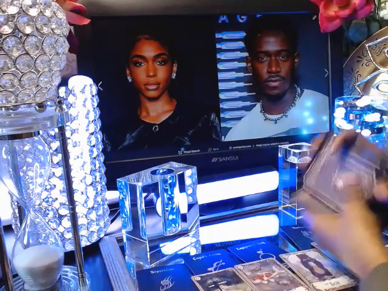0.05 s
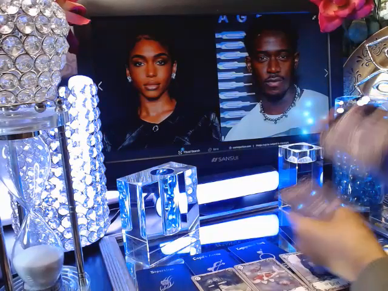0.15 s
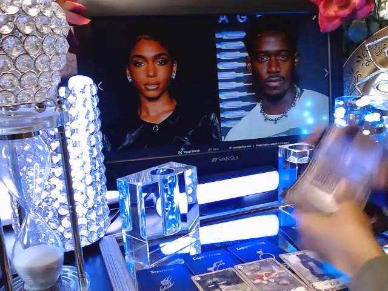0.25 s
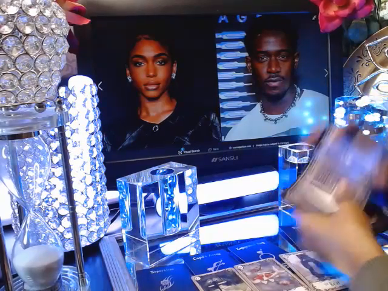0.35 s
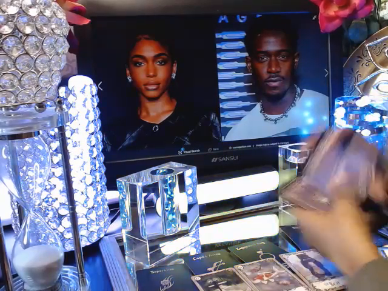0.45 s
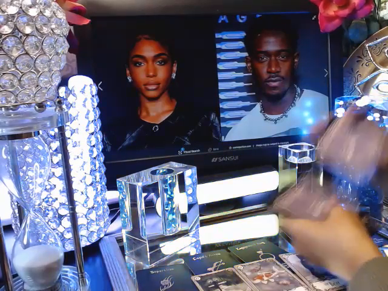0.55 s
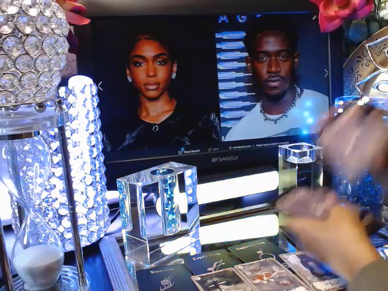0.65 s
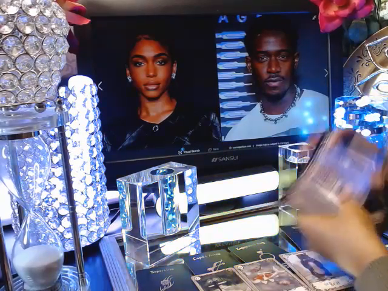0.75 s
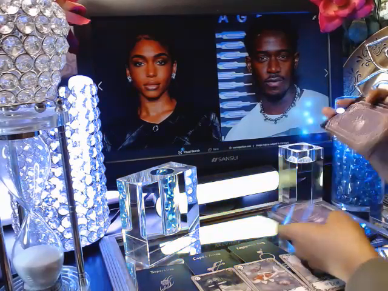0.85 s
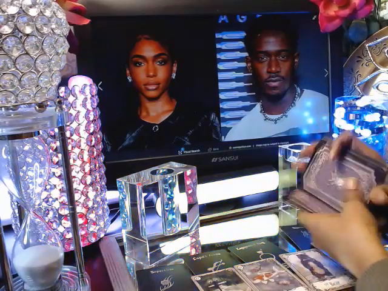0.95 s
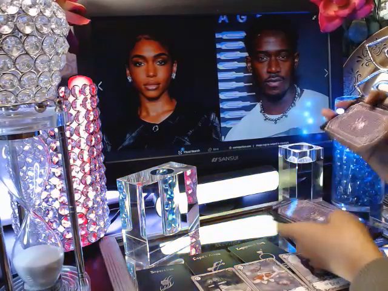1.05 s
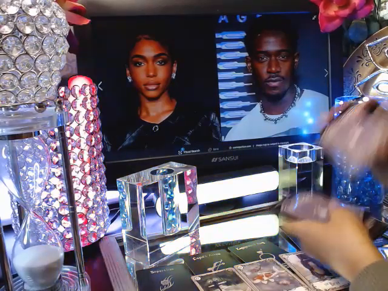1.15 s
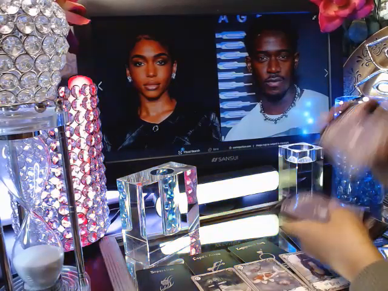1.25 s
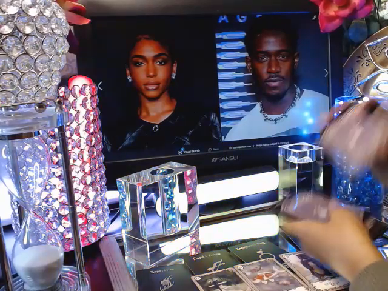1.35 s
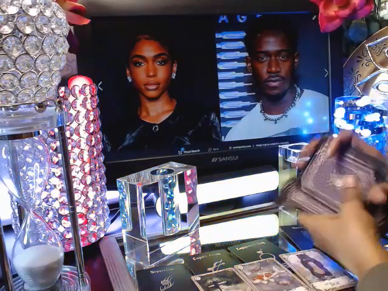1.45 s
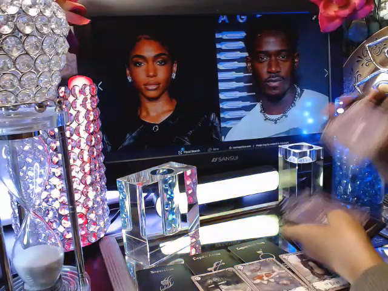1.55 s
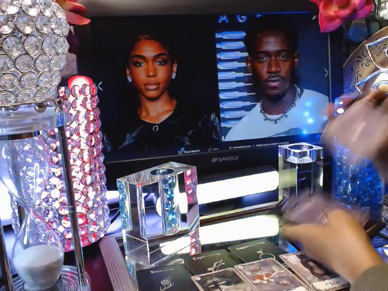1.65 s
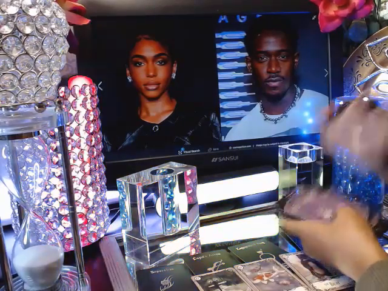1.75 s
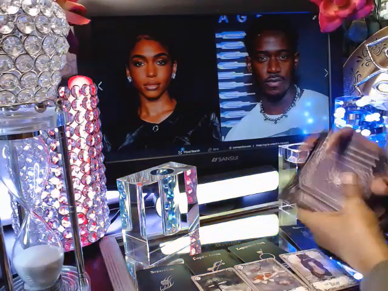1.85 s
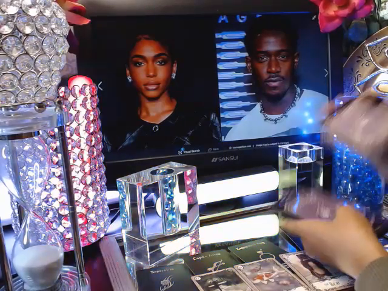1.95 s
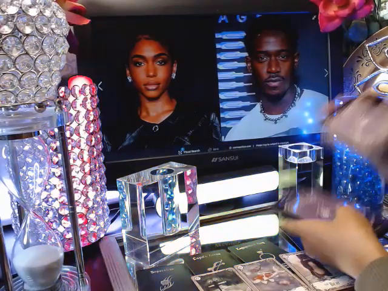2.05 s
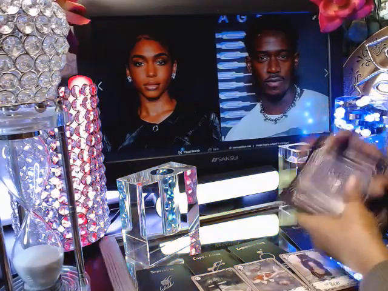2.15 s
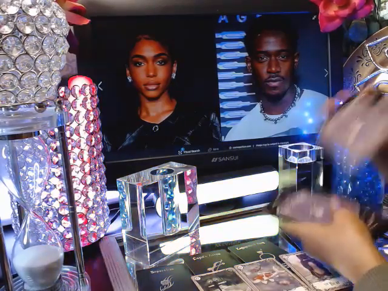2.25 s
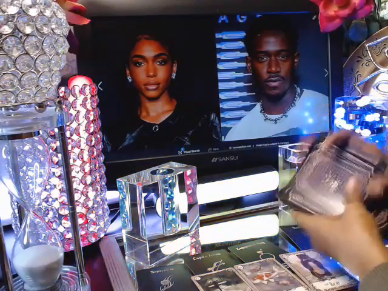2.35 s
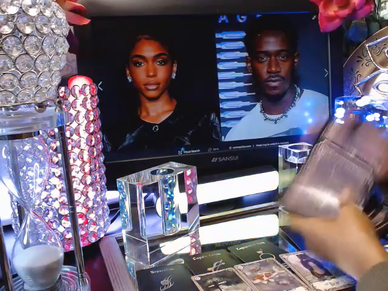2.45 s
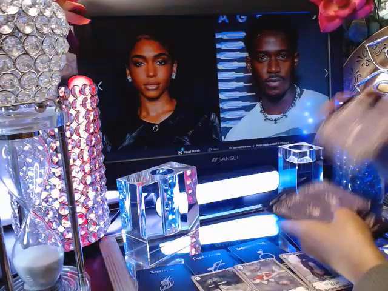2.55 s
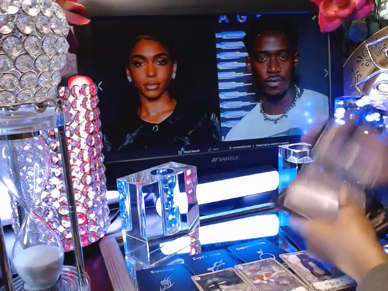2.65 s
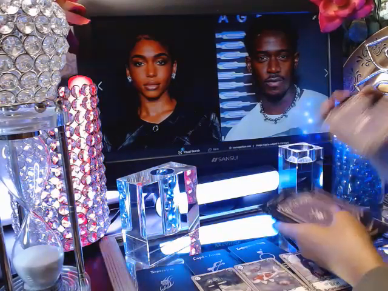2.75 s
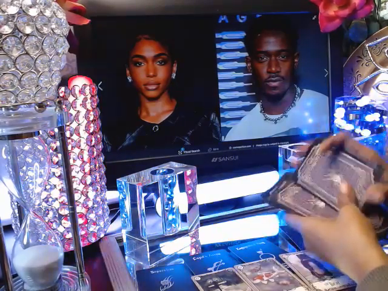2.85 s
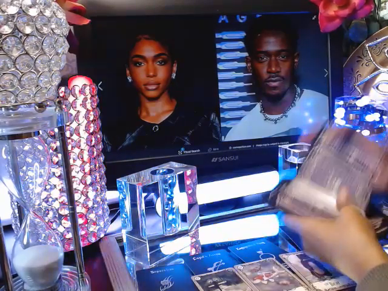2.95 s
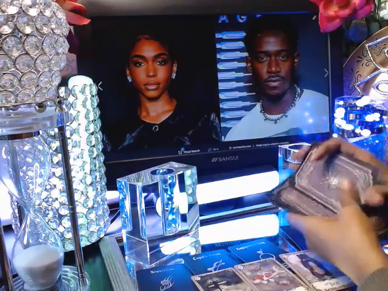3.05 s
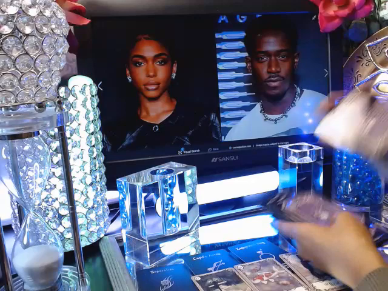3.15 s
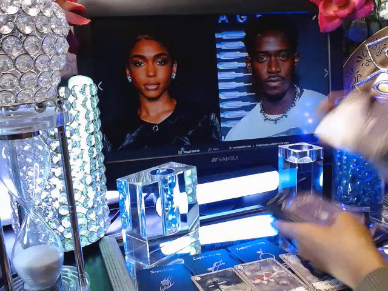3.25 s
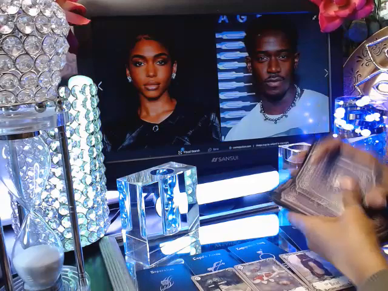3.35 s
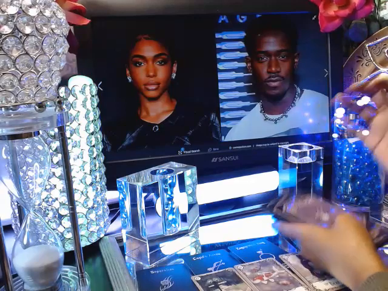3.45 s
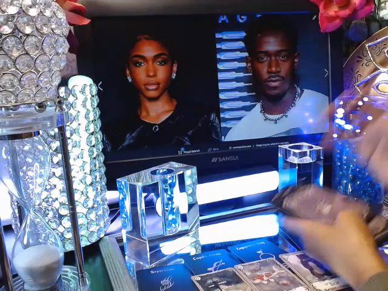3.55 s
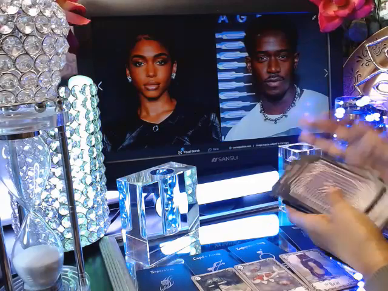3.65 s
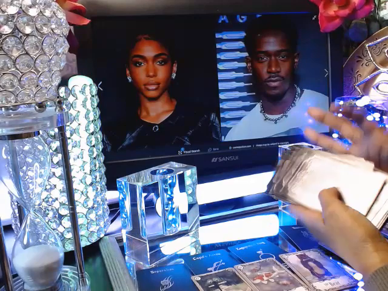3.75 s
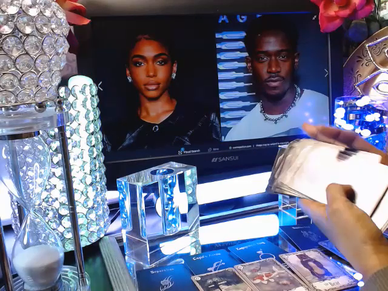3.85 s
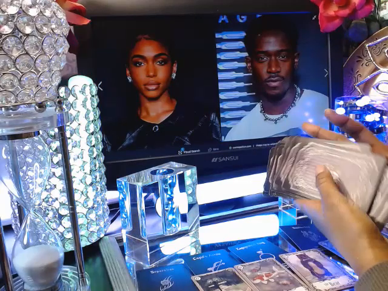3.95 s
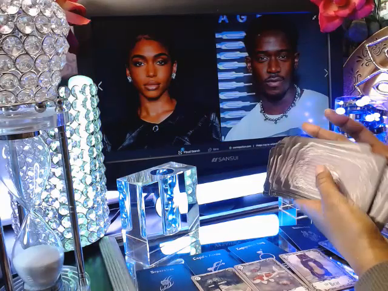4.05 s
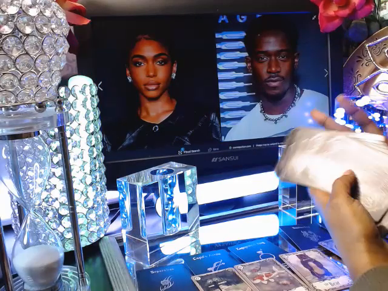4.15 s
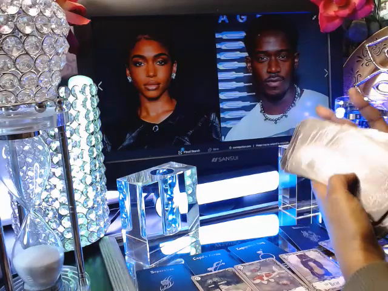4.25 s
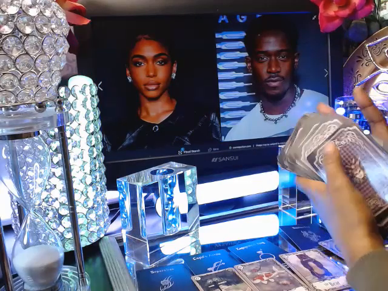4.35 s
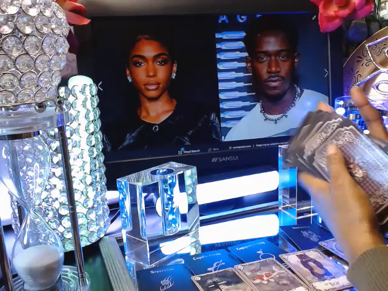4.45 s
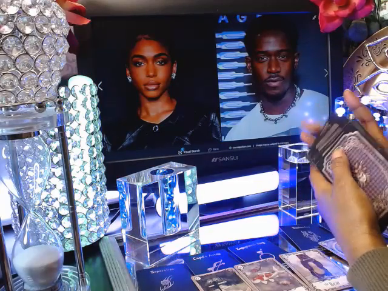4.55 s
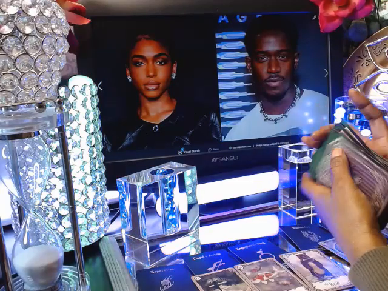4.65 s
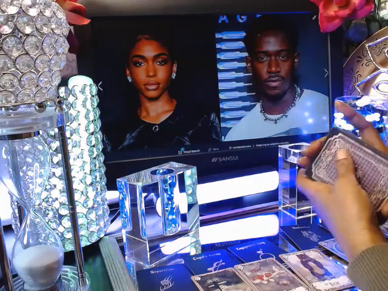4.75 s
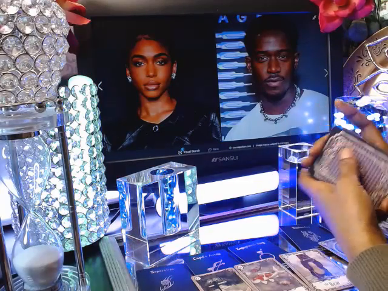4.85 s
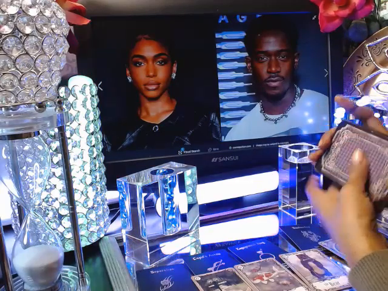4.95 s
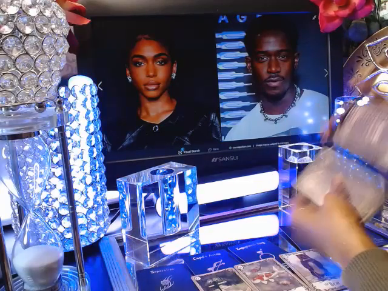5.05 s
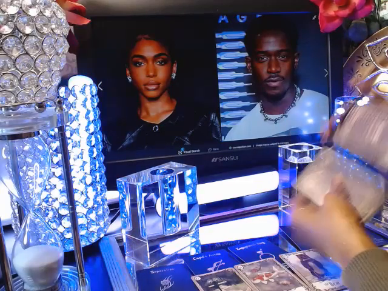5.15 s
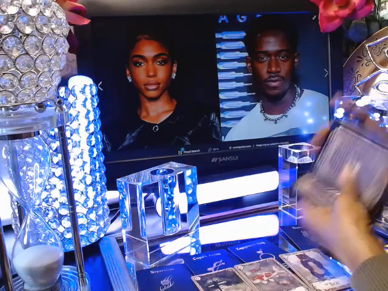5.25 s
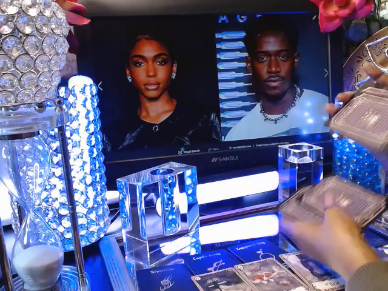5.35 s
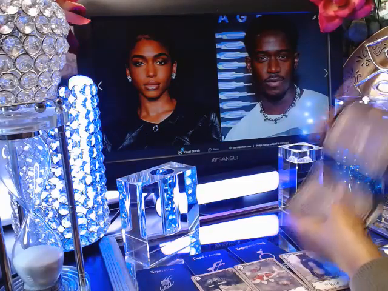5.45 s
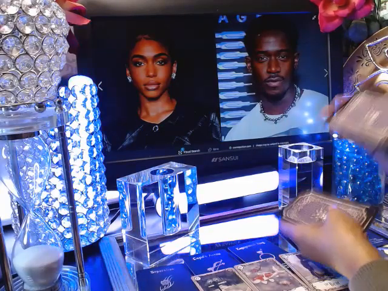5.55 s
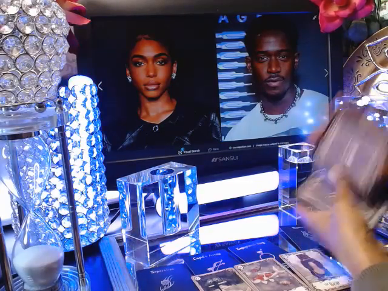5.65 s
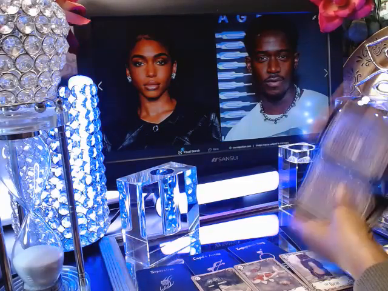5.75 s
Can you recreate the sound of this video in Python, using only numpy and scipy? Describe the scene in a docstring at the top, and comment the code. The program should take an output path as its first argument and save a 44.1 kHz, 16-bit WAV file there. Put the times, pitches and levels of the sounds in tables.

```python
"""An appliance hums in a small room: wavering tones over shaped noise for the air, with cards rubbing faintly in the hand.
A deck of large cards is shuffled overhand, about four strokes a second. In each stroke a packet slides in on
grainy noise, slaps onto the ringing deck, and card edges tick as the next packet is lifted.
After some three and a half seconds the strokes pause while the deck is turned and slips in the palm; then they resume.
A diffuse echo follows every card sound, and the close microphone rounds the loudest peaks."""
import sys
import numpy as np
from scipy import signal
from scipy.fft import rfft, irfft
from scipy.io import wavfile

SR = 44100
rng = np.random.default_rng(int(sys.argv[2]) if len(sys.argv) > 2 else 0)


def generate_wav(sig):
    """Save sig (samples, or channels by samples) to the path in sys.argv[1] as 16-bit PCM at SR."""
    pcm = np.round(np.clip(np.atleast_2d(sig).T, -1, 1) * 32767).astype(np.int16)
    wavfile.write(sys.argv[1], SR, pcm)


N = 256529

# Levels of slaps, ticks, slides, turns and handling are set before the trim of their function.
# steady air rumble, a relative spectrum: (frequency [Hz], density [dB per Hz])
AIR_SPECTRUM = [(12, -10.5), (21, 1.5), (31, -1.5), (42, 0), (53, -1.5), (105, -18), (135, -8.5),
                (190, -21), (260, -20), (440, -25.5), (760, -25), (1500, -39.5), (2600, -47), (7800, -58)]
AIR_DB = -38
# the appliance's tones: (frequency [Hz], mean level [dB])
HUM_TONES = [(59.2, -41.5), (88.5, -51), (120, -56), (140, -54), (220.9, -53), (258.2, -56.5), (592, -71.5),
             (759, -68), (915, -66), (1346, -70)]
# fingers shifting on the cards, resting while the deck is turned: (time [s], level [dB])
HANDLING_LEVELS = [(0, -50), (.6, -51), (1.17, -52.5), (1.75, -48.5), (2.3, -53), (2.58, -39.5),
                   (2.78, -52.5), (3.55, -54.5), (3.66, -71), (4.9, -76), (5.0, -55), (5.82, -51)]
# sliding friction, a relative spectrum: (frequency [Hz], density [dB per Hz])
FRICTION_SPECTRUM = [(200, 2.5), (450, -4), (880, 0.5), (1200, -2.5), (1700, 6), (2300, -1.5), (3000, 0),
                     (4500, -3.5), (6200, -4.5), (7800, -14.5)]
# colour of the room's echo before its random lumps and wet level: (frequency [Hz], level [dB])
WALL_COLOUR = [(100, -15.5), (230, 2), (420, -6), (700, -0.5), (1200, 0), (2200, -4), (4000, 2),
               (7500, -4.5)]
# packets landing: (time [s], time over which the cards land [s], note of the cupped air [Hz],
# slap level [dB], brightness [dB per octave], level of the slide that leads in [dB])
PACKETS = [(0.0727, 0.004, 650, -19.5, 0.5, -37), (0.3144, 0.0045, 850, -19, 0.65, -32.5),
           (0.5509, 0.0047, 539, -19, -.4, -34.5), (0.7842, 0.0054, 1484, -18, -.4, -37.5),
           (1.029, 0.009, 644, -21.5, -2.25, -37), (1.2629, 0.0065, 1474, -20, -1, -36),
           (1.4953, 0.0013, 838, -16.5, 2.64, -35.5), (1.7368, 0.0023, 766, -18.5, 2.1, -35),
           (1.9601, 0.0029, 727, -20, 1.5, -37), (2.1959, 0.0041, 1740, -26, 1.7, -35),
           (2.453, 0.0026, 940, -26, -0.6, -45), (2.4669, 0.0037, 836, -24.5, 1.5, -44.5),
           (2.6624, 0.0042, 576, -21, 1.2, -41.5), (2.9097, 0.0064, 580, -20.5, 0, -39.5),
           (2.9164, 0.0047, 1104, -20.5, 0.4, -49), (3.1458, 0.0081, 670, -22, -0.5, -38),
           (3.374, 0.01, 1068, -19, 1.1, -41), (5.01, 0.0053, 950, -27.5, 1.8, -50),
           (5.0262, 0.0033, 1080, -22.5, -0.4, -55), (5.2603, 0.0023, 362, -31.5, -4, -50),
           (5.2765, 0.0047, 850, -26, -1.7, -55), (5.479, 0.0024, 554, -18.5, 2.35, -40),
           (5.7275, 0.0023, 1100, -19, 1.3, -41.5), (5.733, 0.0049, 1340, -19.5, 2.2, -48)]
# the deck slips in the palm as it is turned: (time [s], level [dB])
PALM_SLIPS = [(3.59, -57), (3.78, -57), (4.04, -62), (4.1, -59.5), (4.34, -60.5), (4.5, -59), (4.57, -57.5),
              (4.71, -61.5)]
# every packet slides in for the same time, and runs on a moment after touching down
SLIDE_LEAD_S, SLIDE_OVERRUN_S, TURN_LEAD_S = 0.05, 0.007, 0.039
# modes of the deck in the hand, before grip and damping: (frequency [Hz], width [Hz], level [dB])
DECK_MODES = [(142.3, 97, 6.5), (228, 78, 1.5), (390, 160, -2), (561, 67, -2), (650, 91, -5.5),
              (860, 122, 2), (1120, 120, -9.5), (1423, 640, -6.5), (1774, 152, 0), (2138, 210, -6.5),
              (2785, 480, -7), (3520, 2600, -2), (4610, 430, -7.5), (5550, 890, -2.5)]
# a packet's registers are thud, knock, clap and snap: (edge [Hz]), then (usual offset [dB])
SLAP_EDGES = [120, 400, 1200, 3000, 8000]
SLAP_OFFSETS = [-4, 1.82, 0, -9.5]
# a loose packet, whose cards land one after another, claps more; a tight one traps more air and sounds its note
USUAL_LANDING_S, CLAP_DB_PER_DOUBLING = 0.0043, 6.5
CUPPED_DB, CUPPED_LOSS_DB_PER_DOUBLING = -12.5, 3
# card edges catching and flicking: (time [s], length [s], level [dB], brightness [dB per octave])
EDGE_TICKS = [(0.2011, 0.0028, -32.5, -2), (0.212, 0.0035, -33, 2.5), (0.248, 0.004, -47, -5),
              (0.451, 0.0029, -30.5, 1.7), (0.676, 0.028, -39.5, 0), (0.692, 0.0015, -38, -0.7),
              (0.711, 0.0047, -44.5, 2.5), (0.94, 0.0034, -47.5, -1), (0.991, 0.0021, -38.5, -1.5),
              (1.294, 0.0022, -40, 3.5), (1.4005, 0.00071, -42, -1.5), (1.424, 0.0013, -39, 0.5),
              (1.6657, 0.0049, -44.5, -0.5), (1.87, 0.021, -47.5, -2), (2.095, 0.0048, -48, -0.5),
              (2.116, 0.0093, -45, -0.5), (2.327, 0.0087, -39.5, -4), (2.355, 0.0024, -44.5, 1),
              (2.4174, 0.0058, -38.5, 2.3), (2.567, 0.0025, -29.5, 0), (2.655, 0.0038, -35.5, 1.5),
              (2.817, 0.0022, -46.5, 0.3), (2.904, 0.0013, -31.5, -2), (3.045, 0.0024, -41.5, 1.5),
              (3.0537, 0.0012, -26, 2.5), (3.0588, 0.0058, -34, 1), (3.301, 0.00048, -28, 2.1),
              (3.31, 0.0014, -45.5, -9), (3.3463, 0.0036, -37, 0), (3.37, 0.0034, -30, 0.5),
              (3.392, .002, -37.5, -1), (3.397, 0.0028, -24.5, 3), (3.433, 0.0021, -38, 4),
              (3.594, 0.003, -50, -2), (4.993, 0.0086, -49, -7), (5.1613, 0.0053, -43, -1.5),
              (5.222, .0038, -33.5, -1), (5.239, 0.0093, -38.5, -3.5), (5.251, .0062, -38, -2.5),
              (5.389, 0.0015, -37.5, 1)]
# an edge's registers, low to high: (edge [Hz]), then (usual offset [dB])
TICK_EDGES = [350, 1400, 3500, 8000]
TICK_OFFSETS = [2.3, -3.5, -6.5]
TICK_RING_HZ = 3000  # note of a single bent card
CUTOFF_HZ = 8500


def from_db(db):
    """Decibels to gain."""
    return 10 ** (np.asarray(db) / 20)


def rms_one(x):
    """Scale to an rms of one."""
    return x / np.sqrt(np.mean(x ** 2) + 1e-20)


def unit_energy(x):
    """Scale to a sum of squares of one."""
    return x / np.sqrt(np.sum(x ** 2) + 1e-20)


def add(out, time_s, sound):
    """Mix a sound in at its time, cropped at the end."""
    at = max(int(time_s * SR), 0)
    out[at:at + len(sound)] += sound[:max(N - at, 0)]


def coloured(x, spectrum):
    """Filter a noise by a (Hz, dB) curve, drawn straight over log frequency."""
    hz, level_db = np.transpose(spectrum)
    bins = np.maximum(np.fft.rfftfreq(len(x), 1 / SR), 1)
    gain = from_db(np.interp(np.log(bins), np.log(hz), level_db))
    return irfft(rfft(x) * gain, len(x))


def drift(rate_hz):
    """Random wandering with an rms of one: straight lines between random values, rate_hz values a second."""
    knots = rng.standard_normal(N // 16)
    return rms_one(np.interp(np.arange(N) / SR * rate_hz, np.arange(len(knots)), knots))


def appliance(wander_rad=0.51):
    """Motor and mains tones waver a little in phase and level over the rumble of moving air."""
    t, tones = np.arange(N) / SR, 0
    for hz, level_db in HUM_TONES:
        phase = 2 * np.pi * (hz * t + rng.random()) + wander_rad * drift(5.9)
        wavering_db = level_db + drift(2.1)
        tones = tones + from_db(wavering_db) * np.sqrt(2) * np.sin(phase)
    air = rms_one(coloured(rng.standard_normal(N), AIR_SPECTRUM))
    return tones + from_db(AIR_DB) * air


def handling(gain_db=-2.0, catches_per_s=220, catch_db=-2.0, grip_db=4.5):
    """Cards rub faintly in the fingers as unsteady friction noise, with tiny random catches of their edges."""
    time_s, level_db = np.transpose(HANDLING_LEVELS)
    catches = (rng.random(N) < catches_per_s / SR) * rng.standard_normal(N)
    rub = rng.standard_normal(N) * from_db(grip_db * drift(79))
    mixed = rms_one(rub) + from_db(catch_db) * rms_one(catches)
    rustle = rms_one(coloured(mixed, FRICTION_SPECTRUM))
    course_db = np.interp(np.arange(N) / SR, time_s, level_db)
    return from_db(gain_db + course_db) * rustle


def room(x, wet_db=-8.5, t60_low=0.32, t60_high=0.23, gap_s=0.0018, build_s=0.00091, lumpy_db=2.0):
    """Cards radiate differently to every wall, so the echo is diffuse: each band's energy builds up and dies away."""
    edges, out = np.geomspace(110, 9000, num=17), 0
    white = rng.standard_normal((2, N))
    for k in range(len(edges) - 1):
        hz = np.sqrt(edges[k] * edges[k + 1])
        band = signal.butter(2, edges[k:k + 2], "band", fs=SR, output="sos")
        power = signal.sosfilt(band, x) ** 2
        energy = np.interp(np.arange(N) - gap_s * SR, np.arange(N), power, left=0)
        # the treble dies away sooner
        t60 = np.interp(hz, [500, 6000], [t60_low, t60_high])
        build_keep = np.exp(-1 / (build_s * SR))
        decay_keep = np.exp(-2 * np.log(1000) / (t60 * SR))
        for keep in (build_keep, decay_keep):
            energy = signal.lfilter([1 - keep], [1, -keep], energy)
        colour_db = np.interp(hz, *np.transpose(WALL_COLOUR)) + lumpy_db * drift(200)
        # neighbouring bands take separate noises
        noise = rms_one(signal.sosfilt(band, white[k % 2]))
        out = out + from_db(colour_db) * np.sqrt(energy) * noise
    return from_db(wet_db) * out


def slides(gain_db=0.9, rise=0.87, stop_s=0.012, grain_db=1.0, grip_db=2.5):
    """Friction swells as a packet gathers speed and dies once it lands; the faces stick and slip in fine grains."""
    t, speed = np.arange(N) / SR, np.zeros(N)
    moves = [(time_s, SLIDE_LEAD_S, level_db) for time_s, *_, level_db in PACKETS]
    moves += [(time_s, TURN_LEAD_S, level_db) for time_s, level_db in PALM_SLIPS]
    for time_s, lead_s, level_db in moves:
        start, end = time_s - lead_s, time_s + SLIDE_OVERRUN_S
        swell = np.clip((t - start) / lead_s, 0, 1) ** rise
        stop = np.exp(-np.clip((t - end) / stop_s, 0, 20))
        speed += from_db(level_db) * swell * stop
    unevenness_db = grain_db * drift(1000) + grip_db * drift(120)
    grains = rng.standard_normal(N) * from_db(unevenness_db)
    return from_db(gain_db) * speed * rms_one(coloured(grains, FRICTION_SPECTRUM))


def resonance(force, hz, width_hz):
    """A two-pole band-pass mode with a gain of about one at its centre."""
    r = np.exp(-np.pi * width_hz / SR)
    poles = [1, -2 * r * np.cos(2 * np.pi * hz / SR), r * r]
    return signal.lfilter([(1 - r * r) / 2, 0, (r * r - 1) / 2], poles, force)


def deck(force, damping, grip=0.056, touch_db=1.0):
    """Contacts ring the broad, quickly dying modes of the stack; each new grip shifts and reweights them."""
    out = 0
    grips = rng.standard_normal((len(DECK_MODES), 2))
    for (hz, width_hz, level_db), (shift, weight) in zip(DECK_MODES, grips):
        # the lower modes shift less
        held_hz = hz * np.exp(grip * shift * min(hz / 1500, 1))
        mode = resonance(force, held_hz, width_hz * damping)
        out = out + from_db(level_db + touch_db * weight) * mode
    return out


def registers(edges, usual_db, level_db, brightness):
    """Level of each register: a harder, more edge-on contact tilts them towards the treble."""
    octaves = np.log2(np.multiply(edges[:-1], edges[1:])) / 2
    return level_db + np.array(usual_db) + brightness * (octaves - octaves.mean())


def contact(length, ring_hz, band_db, edges, first, first_hz, settle_s, settle_db, damping, ring_db,
            cards_per_s=3500, ring_q=14.0):
    """The leading card hits, the others follow within the length, then the stack settles."""
    t = np.arange(SR // 16) / SR
    chance, size = rng.random(len(t)), rng.standard_normal(len(t))
    settling = from_db(settle_db) * np.exp(-np.maximum(t - length, 0) / settle_s)
    landing = np.where(t < length, np.sqrt(t / length), settling)
    followers = unit_energy(size * (chance < cards_per_s / SR) * landing)
    # the leading pulse is rounded: a slap's card lands on a cushion of air and sounds duller than a tick's edge
    soften = signal.butter(2, min(first_hz, SR / 4), fs=SR, output="sos")
    leader = signal.sosfilt(soften, first * (t == 0))
    force = leader + followers
    # the stack rings; the bent cards and the air cupped between them add one note of their own
    note = unit_energy(resonance(force, ring_hz, ring_hz / ring_q))
    ringing = unit_energy(deck(force, damping)) + from_db(ring_db) * note
    # grip and angle decide how much of each register sounds
    out = 0
    for k, level_db in enumerate(band_db):
        band = signal.butter(2, edges[k:k + 2], "band", fs=SR, output="sos")
        part = unit_energy(signal.sosfilt(band, ringing))
        # levels count as rms over 10 ms; neighbouring registers take opposite signs
        out = out + (-1) ** k * from_db(level_db) * part * np.sqrt(SR / 100)
    return out


def slaps(gain_db=-1.5):
    """Whole packets land flat on the deck: a cushion of air thuds first, then the cards clap together."""
    out = np.zeros(N)
    for time_s, length, ring_hz, level_db, brightness, _ in PACKETS:
        looseness = np.log2(length / USUAL_LANDING_S)  # doublings of the usual landing time
        clap_db = CLAP_DB_PER_DOUBLING * looseness * np.array([0, 0, 1, 0])
        cupped_db = CUPPED_DB - CUPPED_LOSS_DB_PER_DOUBLING * looseness
        band_db = registers(SLAP_EDGES, SLAP_OFFSETS, level_db, brightness) + clap_db
        slap = contact(length, ring_hz, band_db, SLAP_EDGES, first=1.35, first_hz=2180,
                       settle_s=0.0045, settle_db=-6, damping=0.77, ring_db=cupped_db)
        add(out, time_s, slap)
    return from_db(gain_db) * out


def ticks(gain_db=-0.5, snap_s=0.006):
    """Single edges catch and let go: short ones snap with a strong first pulse, long ones scrape."""
    out = np.zeros(N)
    for time_s, length, level_db, brightness in EDGE_TICKS:
        snap = np.exp(-length / snap_s)
        band_db = registers(TICK_EDGES, TICK_OFFSETS, level_db, brightness)
        tick = contact(length, TICK_RING_HZ, band_db, TICK_EDGES, first=snap, first_hz=6160,
                       settle_s=0.003, settle_db=-4.5, damping=0.61, ring_db=-6.5)
        add(out, time_s, tick)
    return from_db(gain_db) * out


def scene():
    """Cards, their room and the hum, on one channel."""
    cards = slaps() + ticks() + slides() + handling()
    return (cards + room(cards) + appliance())[None]


def record(dry):
    """The close microphone rounds off the loudest peaks, and the top is cut steeply."""
    ceiling = 0.58
    rounded = dry / (1 + (dry / ceiling) ** 4) ** (1 / 4)
    top_cut = signal.cheby2(14, 55, CUTOFF_HZ, fs=SR, output="sos")
    return signal.sosfilt(top_cut, rounded)


dry = scene()
out = record(dry)
generate_wav(out)
```